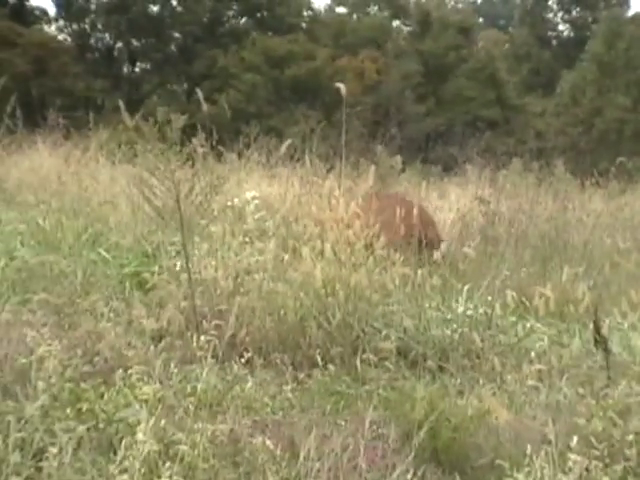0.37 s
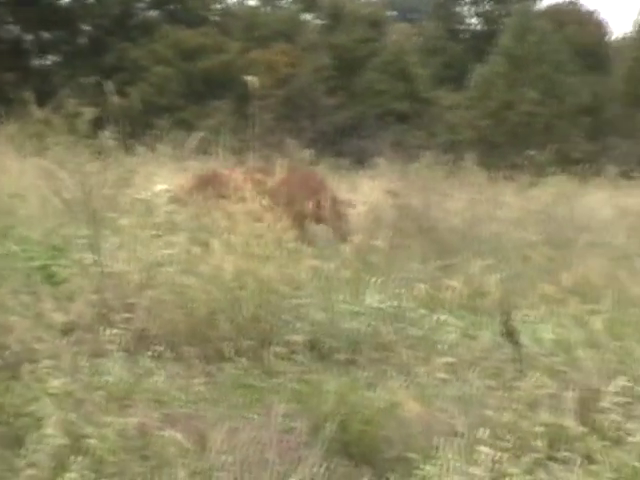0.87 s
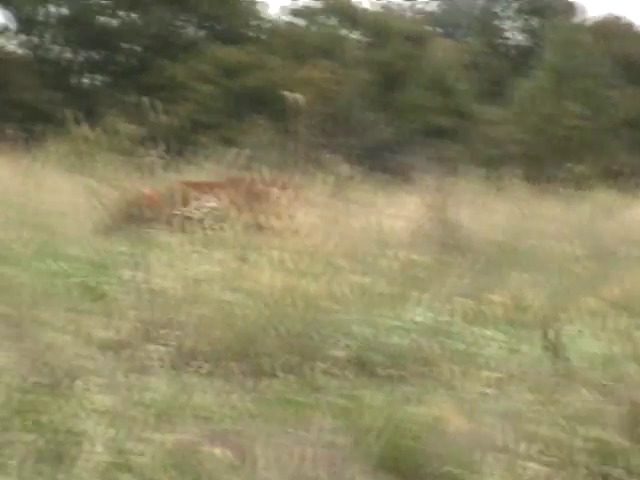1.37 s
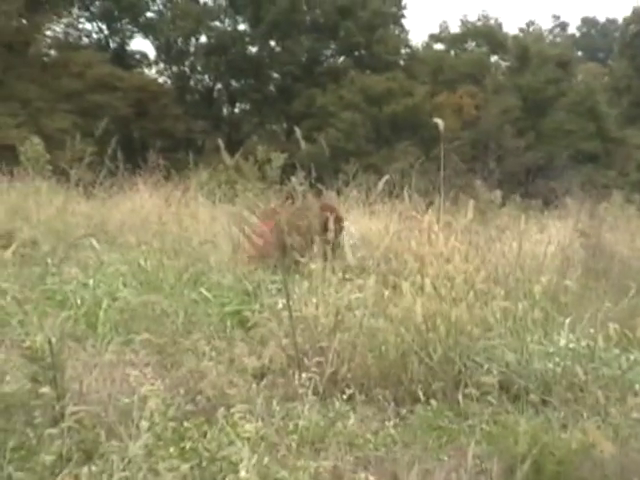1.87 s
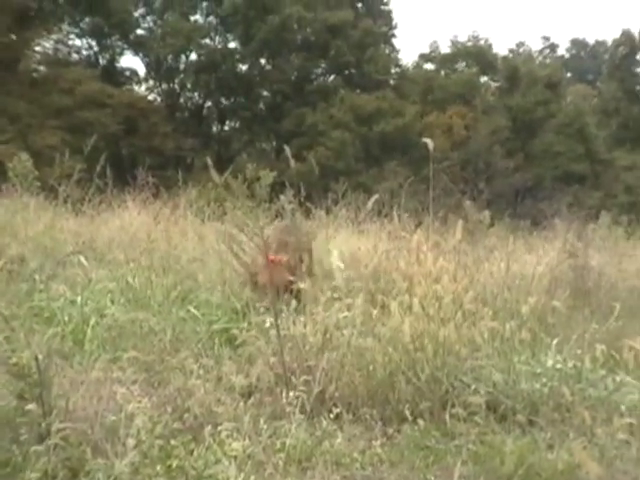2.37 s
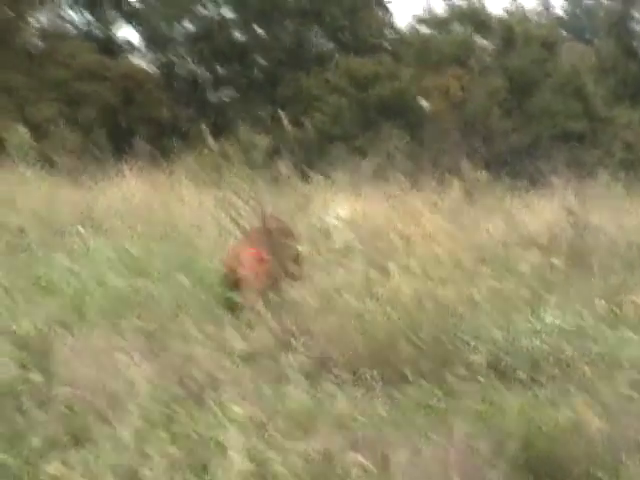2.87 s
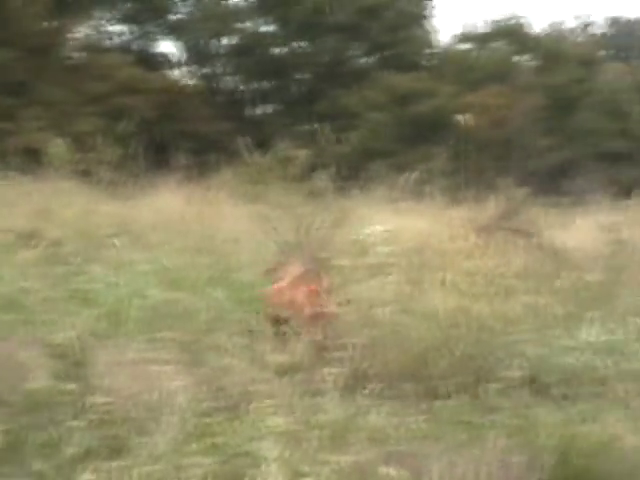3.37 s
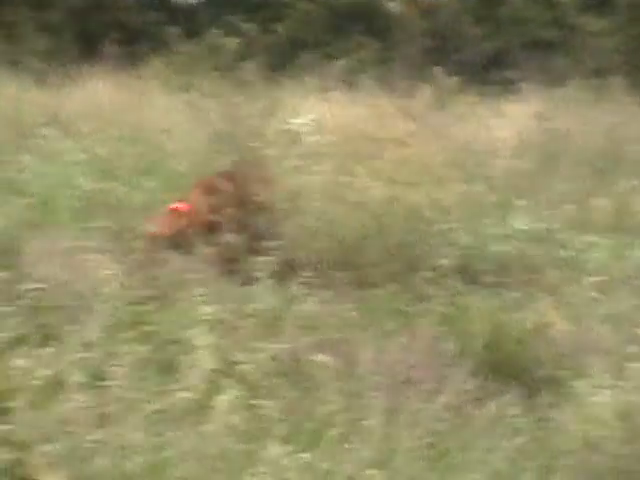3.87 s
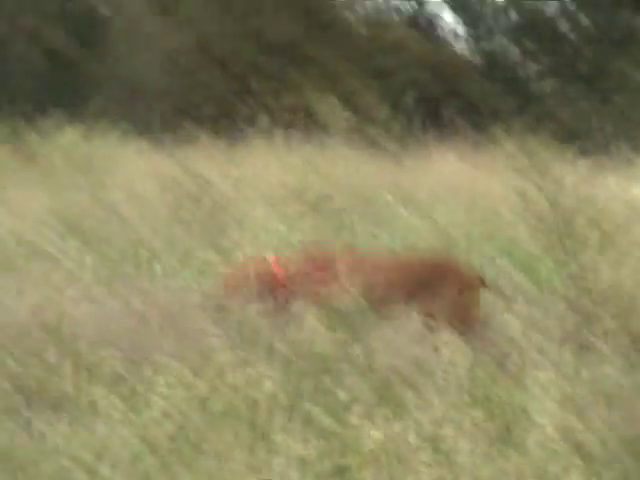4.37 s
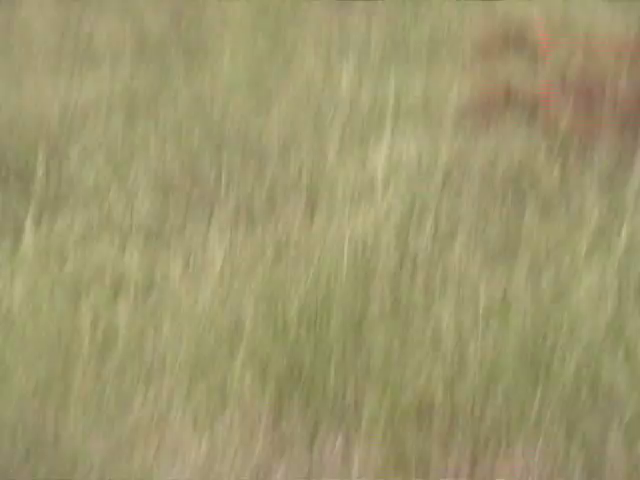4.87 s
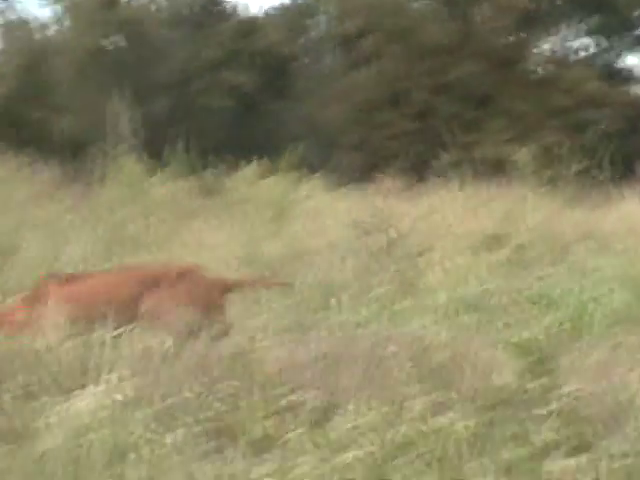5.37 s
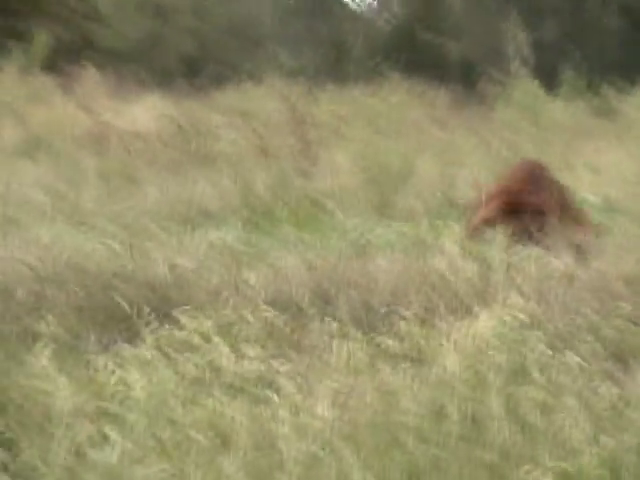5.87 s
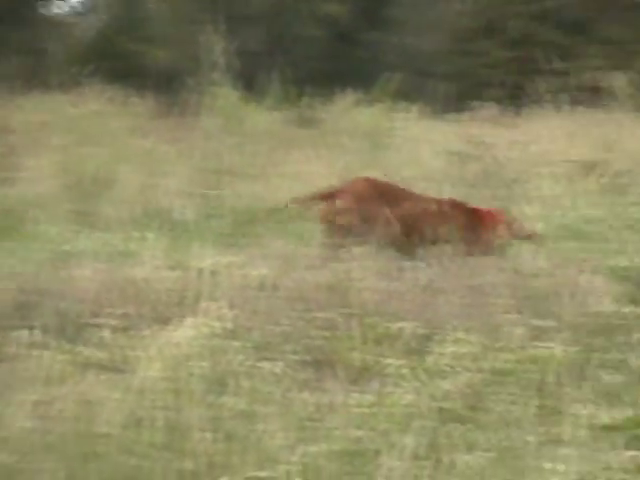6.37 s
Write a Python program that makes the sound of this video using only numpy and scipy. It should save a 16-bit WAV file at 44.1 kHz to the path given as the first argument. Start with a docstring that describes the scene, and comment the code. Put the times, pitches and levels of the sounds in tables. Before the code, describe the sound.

Very close handling noise on a camera microphone outdoors: isolated hard plastic clicks, a clattering group with tiny metallic ringing, a lull, then heavy low bumps, rumble and creaking mixed with sharp rattles. Afterwards come a click or two and soft brushing of dry grass. The background is a quiet steady hiss with a high insect shimmer and faint mechanical hum.

```python
"""A grassy field, heard from a handheld tape camera. Loose strap fittings click and rattle on its plastic
shell: noise bursts and sharp blows through resonances. Two small metal parts jingle as decaying sines.
The gripping hand slips along the shell in low thumps (damped swings), with noise for rumble and creak.
Cloth and grass rustle as shaped noise. Behind them the tape drum hums in steady sines over a far hiss
of insects and air, shaped noise with two nearer chirpers."""
import sys
import numpy as np
from scipy import signal
from scipy.fft import rfft, irfft, next_fast_len
from scipy.io import wavfile
from scipy.ndimage import uniform_filter1d, map_coordinates

SR = 44100
rng = np.random.default_rng(int(sys.argv[2]) if len(sys.argv) > 2 else 0)


def transcribe(u):
    """Save the signal u as a 16-bit wav file named by the first command-line argument.

    u: samples, shape (n,) or (channels, n), limited to [-1, 1]; the rate is SR.
    q: integer samples, one column per channel.
    """
    v = np.clip(np.atleast_2d(u).T, -1, 1)
    q = np.round(v * 32767).astype(np.int16)
    wavfile.write(sys.argv[1], SR, q)


def invert_db(level):
    """Linear amplitude ratio for a level in decibels (20 dB per decade), elementwise."""
    return 10 ** (np.asarray(level, dtype=float) / 20)


N = 287091


def unit(x):
    """x at rms 1."""
    return x / np.sqrt(np.mean(x ** 2) + 1e-20)


def along(points, hz):
    """Value columns of (frequency [Hz], value, ..) interpolated on a log frequency axis."""
    f, *cols = np.transpose(points)
    return np.squeeze([np.interp(np.log(hz + 1), np.log(f + 1), c) for c in cols])


def curves(rows):
    """One value per sample for each column after the time."""
    s, *cols = np.transpose(rows)
    return [np.interp(np.arange(N) / SR, s, c) for c in cols]


def wobble(rate_hz):
    """Smooth random curve through rate_hz random knots a second."""
    knots = rng.standard_normal(int(N * rate_hz / SR) + 4)
    return map_coordinates(knots, [np.arange(N) * rate_hz / SR])


def filtered(x, response):
    """x through a complex response of frequency."""
    m = next_fast_len(N + SR // 2)
    return irfft(rfft(x, m) * response(np.fft.rfftfreq(m, 1 / SR)), m)[..., :N]


def body(modes):
    """Causal sum of (centre [Hz], width [Hz], gain [dB]) resonances of alternating sign."""
    def response(f):
        total = 0
        for k, (centre, width, db) in enumerate(modes):
            damping = 1j * f * width
            total = total + (-1) ** k * invert_db(db) * damping / (centre * centre - f * f + damping)
        return total
    return response


# left-right correlation of noise: (frequency [Hz], correlation [-1..1])
LIKENESS = [(100, 0.93), (400, 0.93), (700, 0.5), (1400, 0.5), (5000, 0.4), (15000, 0.61)]


def rush(spectrum, patchy_db):
    """Stereo noise of rms 1: shaped spectrum, time-frequency patches of random gain, partial correlation."""
    z = signal.stft(rng.standard_normal((2, N)), nperseg=512)[2]
    patches = uniform_filter1d(uniform_filter1d(rng.standard_normal(z.shape[1:]), 6, 0), 10, 1)
    pair = signal.istft(z * invert_db(patchy_db * unit(patches)), nperseg=512)[1][:, :N]

    def response(hz):
        angle = np.arccos(np.clip(along(LIKENESS, hz), -1, 1)) / 2
        return invert_db(along(spectrum, hz)) * [np.cos(angle), np.sin(angle)]

    mid, side = filtered(pair, response)
    return unit(np.array([mid + side, mid - side]))


# shell to the two ports: (frequency [Hz], left phase lead [rad], left-right level [dB], unshared gain [1])
PORT_PATHS = [(96, 11.5, 3, .02), (890, -0.2, -2, 0.036), (3030, 1.34, 2, 0.4), (4340, -2.5, 10, 0.46),
              (5200, 1.4, -2.5, 0.08), (8700, 2, 4.5, 1), (11100, 0.76, 2.5, 0.19), (16000, 2.5, -3, 0.35)]


def ports(x):
    """Shell-borne sound, x = (shared, unshared), reaches the ports with phase and level offsets by frequency."""
    def response(hz):
        lead, db, _ = along(PORT_PATHS, hz)
        return np.array([invert_db(db / 2) * np.exp(.5j * lead), invert_db(-db / 2) * np.exp(-.5j * lead)])
    apart = filtered(x[1], lambda hz: along(PORT_PATHS, hz)[2])
    return filtered(x[0] + apart * [[1], [-1]], response)


# tape drum lines: (frequency [Hz], rms level [dB])
DRUM_LINES = [(150.3, -68), (179.5, -69), (210, -70), (387.6, -66), (449, -70), (510, -70), (569.5, -69),
              (689.1, -68.5), (808.5, -67.5), (867.7, -67)]


def drum():
    """Tape drum: sine lines, each slightly unsteady in level."""
    t = np.arange(N) / SR
    hum = np.zeros(N)
    for hz, db in DRUM_LINES:
        phase = rng.uniform(0, 2 * np.pi)
        hum += np.sqrt(2) * invert_db(db + 0.12 * wobble(6.0)) * np.sin(2 * np.pi * hz * t + phase)
    return hum


# chorus spectrum: (frequency [Hz], relative density [dB/Hz])
CHORUS_SPECTRUM = [(4500, -17.5), (5000, -10), (5440, -4.5), (5650, -8), (5870, -4), (6200, -9.5),
                   (6800, -12), (7300, -16), (8000, -60)]
# nearer singers: (mean pitch [Hz], nominal chirp peak level [dB], chirp rate [1/s], first chirp [s])
NEAR_SINGERS = [(6545, -68, 16.82, .0246), (5400, -68, 16.75, .0124)]


def insects():
    """Far chorus as noise pulsing in level; two nearer singers as pitch-jittered, level-pulsed sines."""
    t = np.arange(N) / SR
    beat_db = np.cos(2 * np.pi * np.cumsum(16.8 + .6 * wobble(2.5)) / SR)
    out = invert_db(-58.5 + beat_db + 1.3 * wobble(4.02)) * rush(CHORUS_SPECTRUM, patchy_db=0.0)
    for hz, db, rate_hz, first_s in NEAR_SINGERS:
        chirps_db = 12 * (np.cos(2 * np.pi * rate_hz * (t - first_s)) - 1)
        chirps_db += 2.5 * wobble(6) + 2 * wobble(150)
        phase = 2 * np.pi * np.cumsum(hz + 45 * wobble(70)) / SR
        out += np.sqrt(2) * invert_db(db + chirps_db) * np.sin(phase)
    return out


# air spectrum: (frequency [Hz], relative density [dB/Hz])
AIR_SPECTRUM = [(15, -50), (25, -13), (127, -5.5), (317, -4), (384, 4), (624, -1.5), (863, -1.5),
                (1040, -9), (1370, -12.5), (1700, -11.5), (3720, -19.5), (7900, -23), (12900, -63),
                (16000, -52)]


def air():
    """Near-steady air: broadband noise, strongest in the low range."""
    return invert_db(-58 + 0.17 * wobble(2.13)) * rush(AIR_SPECTRUM, patchy_db=1.6)


# grass level: (time [s], level [dB])
GRASS_LEVEL = [(0.0, -57), (0.15, -61.5), (0.8, -62.5), (1.5, -68), (2.35, -62), (3.0, -56), (3.6, -64.5),
               (3.75, -58.5), (3.9, -61), (4.24, -57), (4.32, -47.5), (4.42, -54.5), (4.7, -54),
               (4.92, -79), (5.02, -57.5), (5.35, -47.5), (5.86, -60), (5.96, -45), (6.07, -48), (6.2, -53),
               (6.4, -44.5), (6.46, -53), (6.51, -50.5)]
# grass spectrum: (frequency [Hz], relative density [dB/Hz])
GRASS_SPECTRUM = [(1760, -0.5), (4170, -1.5), (5370, 1.5), (6570, 1.5), (8640, 3), (11000, 2), (12800, 4.5),
                  (13700, -2), (15000, -3.5), (16000, -2)]
# cloth level: (time [s], level [dB])
CLOTH_LEVEL = [(0, -64), (1.05, -79), (1.2, -57), (1.5, -69), (1.95, -59), (2.32, -68), (2.81, -55.5),
               (3.21, -61.5), (3.62, -56), (4.11, -64), (4.75, -52.5), (5.6, -55.5), (6.51, -57.5)]
# cloth spectrum: (frequency [Hz], relative density [dB/Hz])
CLOTH_SPECTRUM = [(900, -6), (1300, -8), (1750, -1), (1950, -8.5), (2170, 1), (2450, -8.5), (2900, -7.5),
                  (4500, -18)]


def rustle():
    """Grass brushes past in bright noise swells with fine crackle; cloth rubs lower."""
    crackle = invert_db(.7 * wobble(34) + 1.2 * wobble(330))
    grass = unit(crackle * rush(GRASS_SPECTRUM, patchy_db=.3))
    cloth = unit(invert_db(.8 * wobble(30)) * rush(CLOTH_SPECTRUM, patchy_db=.9))
    return invert_db(curves(GRASS_LEVEL)[0]) * grass + invert_db(curves(CLOTH_LEVEL)[0]) * cloth


# mean course of the dragging hand: (time [s], push level [dB], pitch [Hz])
DRAG_COURSE = [(4.15, -18.5, 141), (4.22, -14.5, 137), (4.27, -16.5, 140), (4.3, -18, 105),
               (4.345, -14.5, 205), (4.37, -10.5, 154), (4.415, -20, 111)]
DRAG_FROM_S, DRAG_TO_S, DRAG_EVERY_S, DRAG_SCATTER_S = 4.1505, 4.42, .0239, .0018
DRAG_UNEVEN_DB, DRAG_UNEVEN_LOG_PITCH = 2.5, .18  # standard deviations, as is the scatter


def judder():
    """Near-periodic slips of the dragging hand: rows (time [s], push level [dB], pitch [Hz])."""
    at = np.arange(DRAG_FROM_S, DRAG_TO_S, DRAG_EVERY_S)
    s, db, hz = np.transpose(DRAG_COURSE)
    late, hard, high = rng.standard_normal((len(at), 3)).T
    times = at + DRAG_SCATTER_S * late
    levels_db = np.interp(at, s, db) + DRAG_UNEVEN_DB * hard
    pitches_hz = np.interp(at, s, hz) * np.exp(DRAG_UNEVEN_LOG_PITCH * high)
    return list(zip(times, levels_db, pitches_hz))


# single slips: (time [s], push level [dB], pitch [Hz])
SLIPS = [(0.883, -38, 153), (0.976, -33, 310), (2.554, -33.5, 200), (2.565, -31.5, 155),
         (2.672, -26.5, 315), (3.294, -35, 150), (3.904, -29, 107), (4.398, -11, 136), (4.445, -15.5, 121),
         (4.5, -10.5, 142), (4.526, -2, 243), (4.6315, -16.5, 174), (4.701, -7, 285), (4.789, -2.5, 328),
         (4.8112, -4.5, 283), (4.8252, -9, 303), (4.848, -3.5, 264), (4.901, -5.5, 204), (4.917, -8.5, 225),
         (5.035, -22, 91.5), (5.189, -29, 123), (5.334, -20.5, 122), (5.737, -24.5, 182),
         (5.839, -19.5, 200), (5.859, -23, 119), (6.161, -32, 118)]
# shell walls under the hand: (centre [Hz], width [Hz], gain [dB])
WALL_MODES = [(270, 46, -16.5), (473, 56, 8.5), (860, 84, 4.5), (1540, 240, 8)]


def slips():
    """Each slip is a push and swing back that slows and dies fast; the shell walls ring on."""
    lead_in = SR // 50
    out, t = np.zeros(N + SR), np.arange(-lead_in, SR // 20) / SR
    for s, db, hz in list(SLIPS) + judder():
        turns = hz * t
        since = np.maximum(turns + 0.566, 0) / 0.3  # swells for most of a turn, then decays
        swing = np.cos(2 * np.pi * turns / (1 + 0.46 * np.abs(turns)))
        out[round(s * SR) - lead_in:][:len(t)] += invert_db(db) * since ** 2 * np.exp(-since) * swing

    def response(f):
        bass_loss = (1j * f / (1j * f + 45)) ** 4
        return (1 + body(WALL_MODES)(f)) * bass_loss

    return filtered(out[:N], response)


# grip noise: (time [s], rumble level [dB], creak level [dB])
GRIP_LEVELS = [(0, -61.5, -64.5), (1.43, -63.5, -59), (1.92, -63.5, -64.5), (3.57, -60, -56.5),
               (4.08, -54.5, -55), (4.2, -47.5, -53), (4.56, -47, -39.5), (4.67, -48, -56),
               (4.77, -50, -45), (4.83, -29, -43), (4.88, -46, -46.5), (4.93, -39, -42.5),
               (5.0, -49, -43.5), (5.06, -50, -39), (5.11, -55, -41), (5.14, -74, -53),
               (5.22, -52.5, -51.5), (5.5, -53, -47), (5.66, -62, -49.5), (6.0, -63, -52.5),
               (6.51, -62, -65)]
# rumble spectrum: (frequency [Hz], relative density [dB/Hz])
RUMBLE_SPECTRUM = [(15, -50), (30, -22), (70, 0.5), (130, -1.5), (220, -1), (400, -18.5), (800, -90)]
# creak spectrum: (frequency [Hz], relative density [dB/Hz])
CREAK_SPECTRUM = [(120, -100), (260, -1), (400, -2), (500, 1), (600, -8.5), (1000, -29.5)]


def hand():
    """Slips of the grip, filled in by rumble and creak noise."""
    rumble_db, creak_db = curves(GRIP_LEVELS)
    lumps_db = np.clip(.2 * (rumble_db + 66), .5, 2.5)  # a working hand is lumpy, a still one smooth
    rumble = invert_db(rumble_db + lumps_db * wobble(9.4)) * rush(RUMBLE_SPECTRUM, patchy_db=0.0)
    creak = invert_db(creak_db) * unit(invert_db(2.5 * wobble(40)) * rush(CREAK_SPECTRUM, patchy_db=1.5))
    return slips() + rumble + creak


# jingle strikes: (time [s], level [dB], part index)
JINGLE_STRIKES = [(2.477, -36, 0), (2.503, -24.5, 0), (2.515, -28, 0), (4.558, -32, 1)]
# per metal part, its partials: (frequency [Hz], nominal level [dB], t60 [s])
METAL_PARTIALS = [
    [(11710, 0, .08), (9500, -10, .08)],
    [(11330, -1, .27), (8710, -5, .2), (9320, -6, .34), (10670, -4, .17), (12800, -6, .15)],
]


def jingles():
    """Two small metal parts ring thinly in decaying sine partials."""
    out, t = np.zeros((2, N + SR)), np.arange(SR // 3) / SR
    shake_db = 3 * wobble(60)  # they swing loose, so the ring is rough
    for s, db, part in JINGLE_STRIKES:
        start = round(s * SR)
        ring = np.zeros((2, len(t)))
        for hz, level_db, t60 in METAL_PARTIALS[round(part)]:
            decay = invert_db(level_db + rng.normal(0, 1) - 60 * t / t60)
            ring += decay * np.sin(2 * np.pi * hz * t + rng.uniform(0, 2 * np.pi, (2, 1)))
        rise = 1 - np.exp(-t / 0.0004)
        out[:, start:][:, :len(t)] += invert_db(db + shake_db[start:][:len(t)]) * ring * rise
    return ports(out[:, :N])


# contacts: (time [s], shell level [dB], knock level [dB], treble level [dB], struck panel pitch [Hz])
CONTACTS = [(0.246, -42.5, -50, -40.5, 3300), (0.263, -38.5, -37, -35, 4860), (0.271, -35, -38, -34, 3450),
            (0.2879, -30, -22, -22, 4370), (0.29, -26, -18, -25.5, 4260), (0.2911, -31.5, -38, -30, 1500),
            (0.2932, -22.5, -16, -49, 4700), (0.4872, -39.5, -38, -42, 3340),
            (0.487, -38, -26.5, -42, 5050), (0.64, -33.5, -23, -28.5, 4420),
            (0.6444, -36, -11.5, -39, 4300), (0.9731, -36.5, -40, -40.5, 4420),
            (0.973, -39, -28, -50, 3360), (0.973, -29.5, -0.5, -44, 1695), (1.266, -43.5, -26, -47, 5100),
            (1.4963, -45, -51, -48, 4300), (1.6397, -42, -26, -46, 1830), (1.706, -51, -27.5, -49, 2600),
            (1.842, -47.5, -30, -49, 2080), (2.199, -33, -23, -31.5, 2200),
            (2.229, -23.5, -10.5, -27, 3480), (2.378, -45.5, -26.5, -43, 2680),
            (2.4775, -29.5, -19, -23.5, 2070), (2.4895, -27, -45, -28, 5000), (2.5026, -32, -25, -24, 4700),
            (2.508, -30, -27, -36, 4240), (2.5144, -36.5, -37, -33.5, 2210), (2.534, -33.5, -31, -36, 4080),
            (2.571, -43, -27, -37, 2100), (2.6394, -35.5, -21.5, -31.5, 2300),
            (2.65, -31.5, -40, -16.5, 5030), (2.658, -20.5, -33, -12, 1836),
            (2.6671, -14.5, -11.5, -10.5, 2300), (2.713, -31, -35, -28.5, 1596),
            (2.719, -40.5, -21.5, -30.5, 1570), (2.75, -42, -30, -45, 1690),
            (2.8732, -32.5, -25, -31.5, 2150), (2.8817, -34.5, -17.5, -33, 2180),
            (2.902, -42, -21.5, -34, 1750), (2.9285, -38.5, -19, -37, 2300),
            (2.935, -35.5, -18, -30.5, 3150), (4.1163, -34, -19, -30.5, 1910), (4.142, -36, -21, -29, 1900),
            (4.151, -29, -23, -28.5, 1970), (4.1618, -32.5, -27, -28.5, 3000),
            (4.1805, -34.5, -24, -30, 2260), (4.441, -40.5, -27, -38, 2260), (4.4933, -30, -18, -50, 3800),
            (4.497, -25, -5, -21.5, 1214), (4.549, -22.5, -8.5, -22, 2270), (4.5555, -16, -11, -13.5, 1800),
            (4.5638, -12.5, -10, -12.5, 3410), (4.578, -37.5, -31, -24.5, 2250),
            (5.4338, -22.5, -27, -26, 2940), (5.4343, -26, -15, -33, 1715), (5.4355, -23.5, -24, -32, 977),
            (5.835, -35.5, -13.5, -41, 5650)]
# plastic shell: (centre [Hz], width [Hz], gain [dB])
SHELL_MODES = [(285, 95, 2.5), (1062, 54, 8.5), (1750, 450, 6.5), (2270, 310, 5.5), (3090, 910, 10),
               (3480, 1800, 6)]
# thin fittings: (centre [Hz], width [Hz], gain [dB])
FITTING_MODES = [(4700, 1460, 0), (5900, 2300, -2.5), (7740, 1000, 0), (8400, 2460, -2.5),
                 (11080, 2440, 1.5), (11410, 840, 4), (12700, 560, -6.5), (15300, 380, -4)]
# hollow of the shell, applied twice: (centre [Hz], width per pass [Hz], gain per pass [dB])
HOLLOW_MODES = [(830, 219, 1.5), (998, 196, -4.5)]
SHELL_TOP_HZ = 3300  # the shell is dull above this
SPREAD_DB, SPOT_DB, SPOT_Q = -3.5, 3.5, 3  # grit into the whole shell; into the struck panel alone
HARD_DB = -12.5  # shell level below which a contact counts as softer
CRACK_DB, CRACK_T60_S, CRACK_LOSS = 11.5, 0.0048, 0.12  # first instant, over grit; loss dB per softer dB
SNAP_DB, SNAP_LATE_S, SNAP_LOSS = 15.5, 0.001019, 0.13  # one sharp blow; loss dB per softer dB
GRIT_RISE_S, RISE_SLOWS = 0.00083, 0.12  # hard-contact rise; softer ones scrape in slower, dB per dB
GRIT_T60_S, DAMPING = 0.048, 0.77  # t60 at treble = shell level; dB of time per dB of treble excess
RATTLE_DB, RATTLE_T60_S = -21, 0.19  # what shakes on afterwards
PANEL_DB, PANEL_FAVOURS = 1, 0.15  # panel ring over shell level; plus dB per dB of missing treble
PANEL_TURNS, PANEL_LONGEST_S, PANEL_RISE_S = 77, 0.031, .0005  # cycles to -60 dB; t60 limit; rise
PUSH_DB, PUSH_S, HOLLOW_GRIT_DB = -4, 0.00073, -9  # shove into the hollow; little grit reaches it


def clicks():
    """A contact's crack, blow, grit and weak rattle drive shell, panel, fittings and hollow."""
    t = np.arange(SR // 5) / SR
    shell, edge, struck = np.zeros((3, 2, N + SR))
    hollow = np.zeros(N + SR)
    crack = (1 - np.exp(-t / 0.00039)) * invert_db(CRACK_DB - 60 * t / CRACK_T60_S)
    rattle = invert_db(RATTLE_DB - 60 * t / RATTLE_T60_S)
    for s, db, knock_db, treble_db, hz in CONTACTS:
        at = slice(round(s * SR), round(s * SR) + len(t))
        softer_db = max(HARD_DB - db, 0)
        t60 = GRIT_T60_S * invert_db(DAMPING * (treble_db - db))
        rise = 1 - np.exp(-t / (GRIT_RISE_S * invert_db(RISE_SLOWS * softer_db)))
        shape = invert_db(-CRACK_LOSS * softer_db) * crack + rise * (invert_db(-60 * t / t60) + rattle)

        grain_db = 2.0 * rng.standard_normal(len(t) // 30 + 1).repeat(30)[:len(t)]
        grit = rng.standard_normal((4, len(t))) * invert_db(grain_db)
        grit[[0, 2], round(SNAP_LATE_S * SR)] += invert_db(SNAP_DB - SNAP_LOSS * softer_db)  # shared parts only
        burst = shape * grit
        shell[:, at] += invert_db(db + SPREAD_DB) * burst[:2]
        edge[:, at] += invert_db(treble_db) * burst[2:]
        struck[:, at] += invert_db(db + SPOT_DB) * signal.lfilter(*signal.iirpeak(hz, SPOT_Q, SR), burst[:2])

        panel_db = db + PANEL_DB + PANEL_FAVOURS * (db - treble_db)
        panel_t60 = min(PANEL_TURNS / hz, PANEL_LONGEST_S)
        panel = invert_db(panel_db - 60 * t / panel_t60) * (1 - np.exp(-t / PANEL_RISE_S))
        struck[0, at] += panel * np.sin(2 * np.pi * hz * t)
        push = invert_db(PUSH_DB) * (t < PUSH_S)
        hollow[at] += invert_db(knock_db) * (push + invert_db(HOLLOW_GRIT_DB) * burst[1])

    def shell_response(f):
        bandpass = body([(SHELL_TOP_HZ, SHELL_TOP_HZ, 0)])(f)
        lowpass = bandpass * SHELL_TOP_HZ / (1j * f + 1)
        return body(SHELL_MODES)(f) * lowpass

    # hollow twice: it swells, then dies
    struck[0, :N] += filtered(hollow[:N], lambda f: body(HOLLOW_MODES)(f) ** 2)
    plastic = filtered(shell[:, :N], shell_response)
    fittings = filtered(edge[:, :N], body(FITTING_MODES))
    return ports(plastic + fittings + struck[:, :N])


def scene():
    """All sources at the two ports."""
    return air() + insects() + drum() + rustle() + hand() + jingles() + clicks()


def low_pass(x):
    """Removes everything above the highest recorded frequency."""
    return signal.sosfilt(signal.butter(12, 16990, fs=SR, output="sos"), x)


def record(dry):
    """Little passes above the band limit; the input rounds off the hardest peaks."""
    limited = filtered(dry, lambda hz: np.where(hz < 15750, 1, invert_db(-38)))
    top = .9  # asymptotic peak, full scale = 1
    mix = limited / (1 + np.abs(limited / top) ** 4) ** (1 / 4)
    return low_pass(mix)


dry = scene()
out = record(dry)
transcribe(out)
```